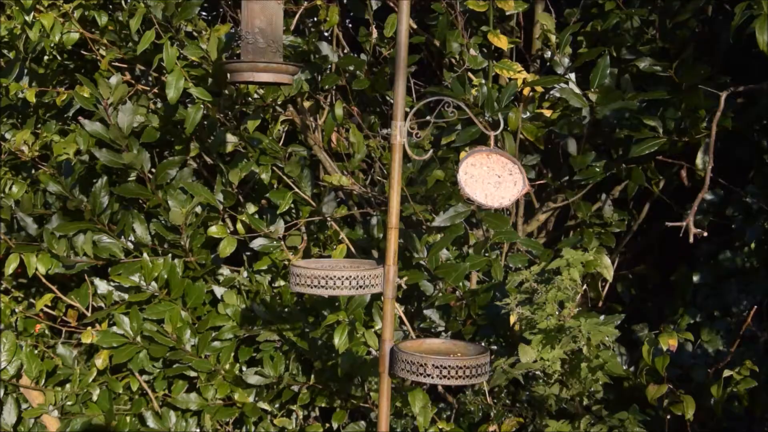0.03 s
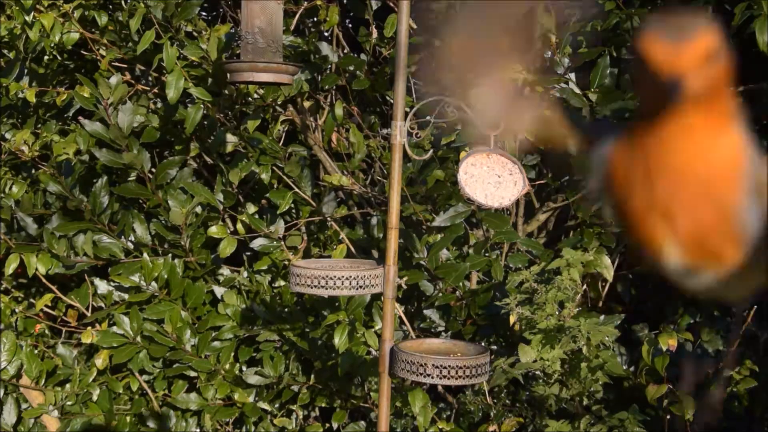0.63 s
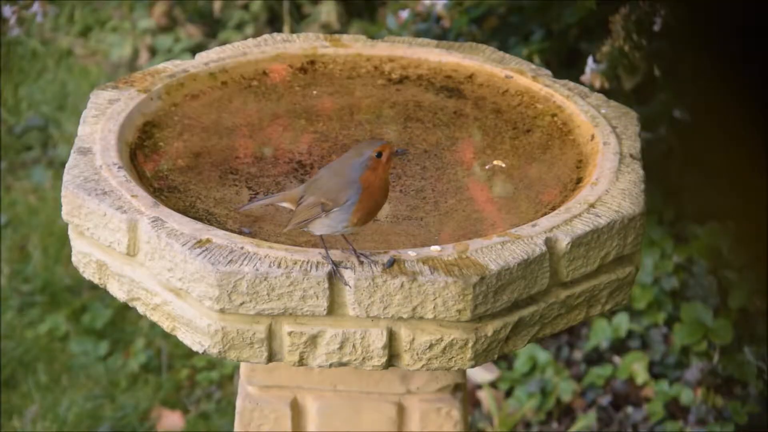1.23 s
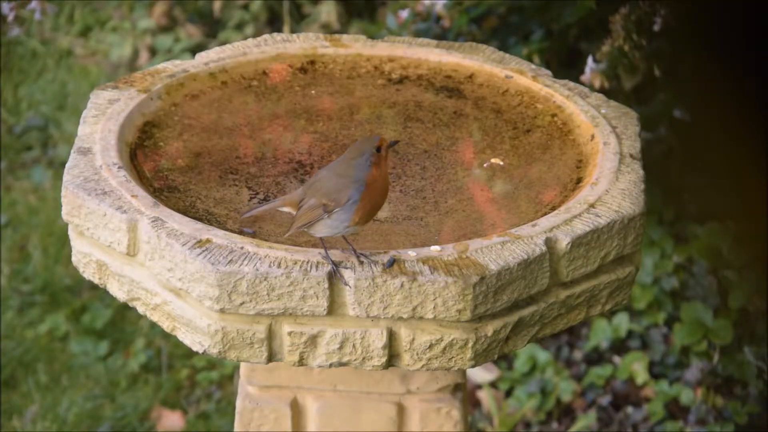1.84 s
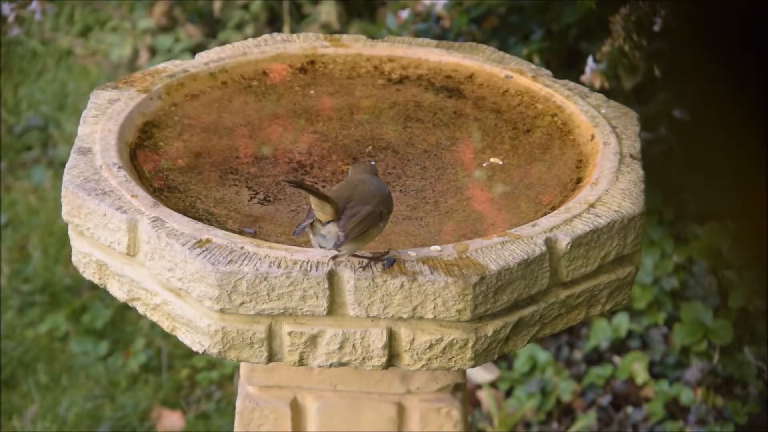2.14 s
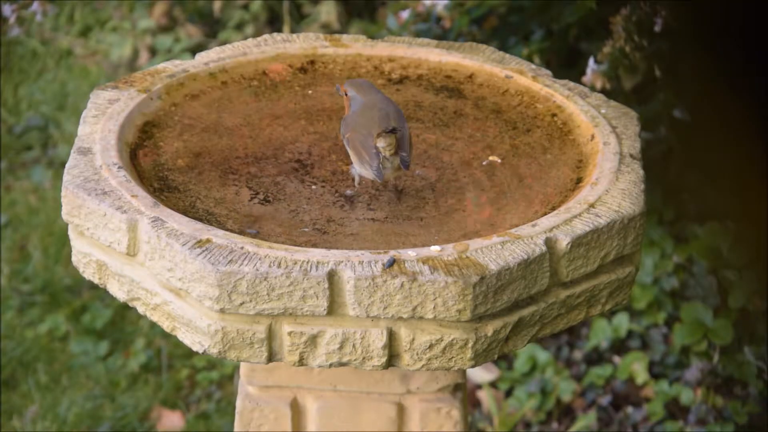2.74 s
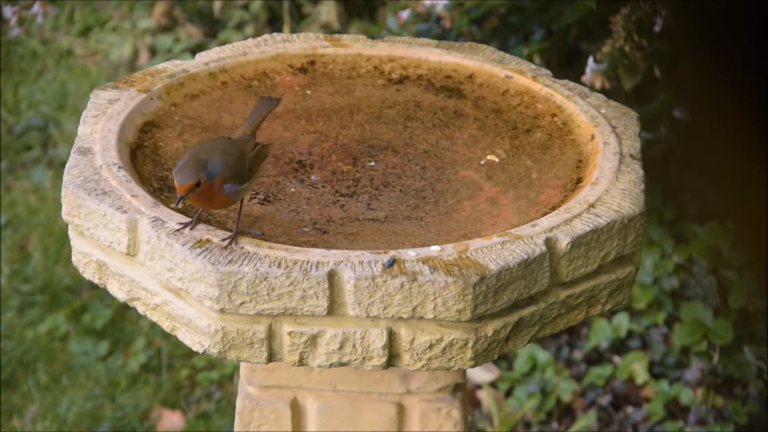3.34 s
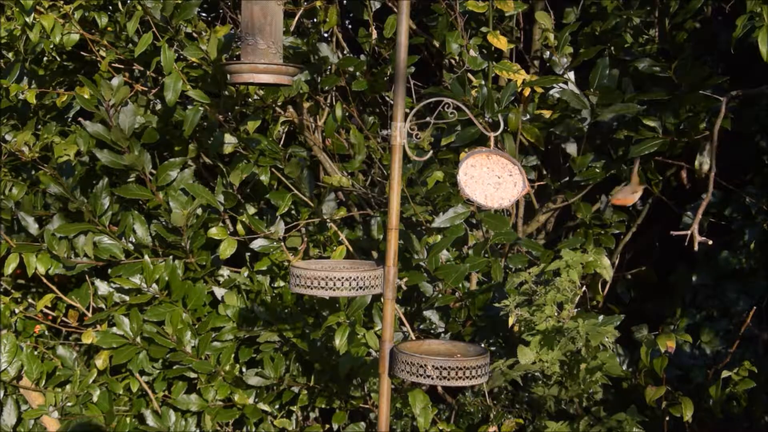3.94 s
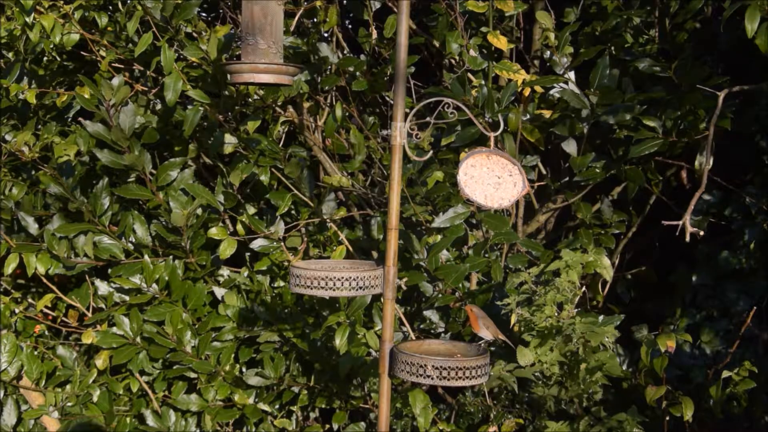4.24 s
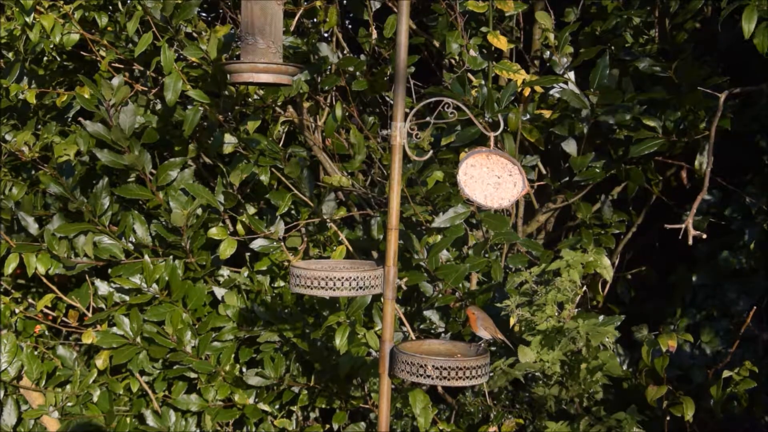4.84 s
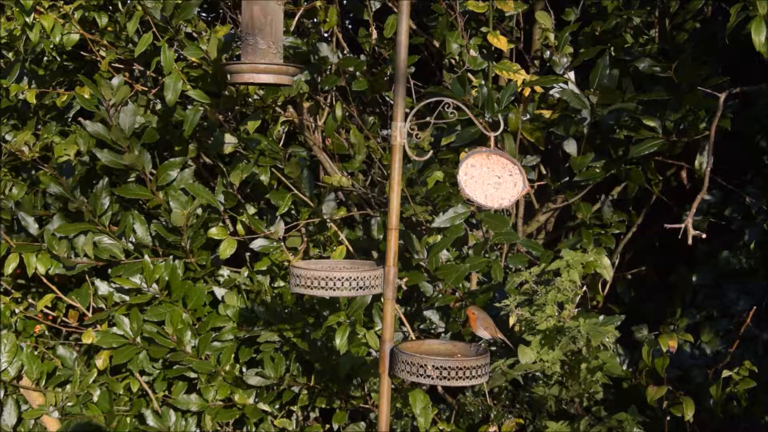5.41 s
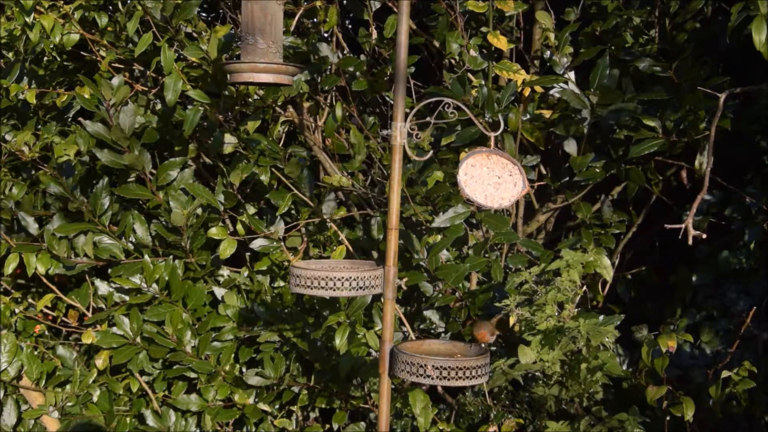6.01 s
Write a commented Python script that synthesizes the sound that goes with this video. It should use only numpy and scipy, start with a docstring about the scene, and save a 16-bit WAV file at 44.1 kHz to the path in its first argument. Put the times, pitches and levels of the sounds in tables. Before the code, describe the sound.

Outdoors in a garden, a nearby songbird delivers thin, raspy high notes that drop into clear whistles and rapid chips. A second phrase of short downward slides follows, with barely audible ticks of bath water around it. The bird pauses, then ends with a bright warbling burst and a soft trailing note. A quiet, uneven background rush runs underneath, and hedges add a brief echo to the close song.

```python
"""Robin in a garden

A robin sings three quick phrases close to a small stereo microphone. The two sides of its syrinx
give pure whistles, hoarse two-voiced notes and short chips, which echo briefly off nearby surfaces
and hedges. Soft outdoor background noise fades up and down behind it, with faint ticks of bath water."""
import sys
import numpy as np
from scipy import signal
from scipy.fft import rfft, irfft
from scipy.io import wavfile
from scipy.ndimage import uniform_filter1d, minimum_filter1d

SR = 44100
rng = np.random.default_rng(int(sys.argv[2]) if len(sys.argv) > 2 else 0)


def master_out(mix):
    """Clip the mix to full scale and print it as 16-bit PCM to the path in sys.argv[1]."""
    frames = np.transpose(np.atleast_2d(mix))
    ceiling = np.clip(frames, -1, 1)
    pcm = np.round(ceiling * 32767).astype(np.int16)
    wavfile.write(sys.argv[1], SR, pcm)


N = 267510
TIME = np.arange(N) / SR
WHISTLE_EDGE_S = .005

# fades of the background noise: t/s, level/dB, relative upper band/dB
BACKGROUND_LEVEL = [(0.1, -61, -11), (0.28, -48, -6), (0.74, -51, -6), (1.06, -44.5, -9.5),
                    (1.94, -40.5, -6.5), (2.53, -49.5, -1), (3.65, -41.5, -3.5), (3.79, -40, -6),
                    (3.81, -45.5, -4.5), (4.29, -58, -11.5), (4.66, -47, -6), (5.01, -46.5, -6),
                    (5.27, -54.5, -10.5), (6.05, -61, -17)]


def undb(db):
    """Decibels to gain."""
    return 10 ** (np.asarray(db) / 20)


def add(out, start_s, sound):
    """Mix a sound in at its time."""
    i = int(start_s * SR)
    out[i:i + len(sound)] += sound[:N - i]


def walk(size, rate_hz):
    """Smooth random wander, spread near 1."""
    hold = max(int(SR / rate_hz), 1)
    steps = np.repeat(rng.standard_normal(size // hold + 1), hold)
    return 1.35 * uniform_filter1d(uniform_filter1d(steps, hold), hold)[:size]


def delay(x, lag_s):
    """Fractional-sample delay."""
    return irfft(rfft(x) * np.exp(-2j * np.pi * np.fft.rfftfreq(N, 1 / SR) * lag_s), N)


def coloured(spectrum):
    """Noise of the given spectrum, rms 1."""
    hz, db = np.transpose(spectrum)
    gain = undb(np.interp(np.log(np.fft.rfftfreq(N, 1 / SR) + 1), np.log(hz), db))
    noise = irfft(rfft(rng.standard_normal(N)) * gain, N)
    return noise / noise.std()


def edges(size, edge_s):
    """Rounded attack and release."""
    from_edge_s = np.minimum(np.arange(size), np.arange(size)[::-1]) / SR
    return np.sin(np.pi / 2 * np.minimum(from_edge_s / edge_s, 1)) ** 2


def contour(shape, length_s, top_hz, end_hz):
    """Stretch a note shape to a length and pitch range; returns f/Hz, level/dB."""
    share, height, db = np.transpose(shape)
    u = np.linspace(0, 1, int(length_s * SR))
    return end_hz + (top_hz - end_hz) * np.interp(u, share, height), np.interp(u, share, db)


def note_clock(length_s):
    """Seconds into a note, and the share of it gone by."""
    t = TIME[:int((length_s + WHISTLE_EDGE_S) * SR)]
    return t, t / t[-1]


def outdoor_noise(gain_db=1.5, upper_lift_db=6, side_db=-27, split_hz=1400):
    """Soft, nearly mono background noise; its level and its upper band fade up and down."""
    # noise spectrum: f/Hz, relative density/dB
    spectrum = [(25, -36.5), (200, -17.5), (500, -10), (900, 0), (1350, -1), (2000, -8.5), (3000, -18),
                (7000, -38.5), (15000, -45)]
    at_s, db, upper_db = np.transpose(BACKGROUND_LEVEL)
    body_gain = undb(np.interp(TIME, at_s, db, left=-np.inf) + gain_db)
    upper_gain = undb(np.interp(TIME, at_s, upper_db) + upper_lift_db)
    noise = coloured(spectrum) + undb(side_db) * coloured(spectrum) * np.array([[1], [-1]])
    low = signal.sosfiltfilt(signal.butter(2, split_hz, fs=SR, output="sos"), noise)
    return body_gain * undb(.5 * walk(N, 17)) * (low + (noise - low) * upper_gain)


def rumble(db=-76, peak_s=4.82, half_width_s=.22, lift_db=7):
    """Faint wavering rumble that swells under the last phrase."""
    swell_db = 2.8 * walk(N, 11) + lift_db * np.exp(-((TIME - peak_s) / half_width_s) ** 2)
    return coloured([(30, -14.5), (120, -7.0), (1000, -56.5)]) * undb(db + swell_db)


def hiss(db=-70):
    """Thin steady hiss, heard when the outdoor noise fades down."""
    # hiss spectrum: f/Hz, relative density/dB
    spectrum = [(6000, -5), (7200, -11.5), (15000, -19.5)]
    return undb(db) * coloured(spectrum)


def hoarse_notes(sum_db=-28, sideband_db=-9.5, burst_db=14, burst_s=.007):
    """Both sides of the syrinx sound at once and mix into sum tones and sidebands."""
    # high notes: t/s, length/s, top f/Hz, level/dB, relative lower voice/dB
    notes = [(.637, .068, 7350, -37, -22), (.758, .071, 7400, -26.5, -20), (.901, .077, 7150, -21, -10),
             (1.076, .04, 6800, -18.5, -15), (1.137, .016, 7050, -24, -9), (1.155, .017, 6850, -23, -15),
             (1.190, .011, 6600, -23.5, -4), (1.203, .026, 6950, -20.5, -17), (1.250, .013, 6900, -22, -5),
             (1.265, .028, 7050, -20, -19), (1.314, .012, 7050, -21.5, -7), (1.329, .02, 7000, -21, -18),
             (1.377, .011, 6650, -23.5, -5), (1.393, .027, 7000, -22, -19)]
    # flick and sag: share of length, height from end to top pitch, level/dB
    shape = [(0, -1.4, -8), (.08, .7, -1), (.17, 1, 1), (.36, .56, 0), (.7, .4, 0), (1, 0, -8)]
    out = np.zeros(N)
    for at_s, length_s, top_hz, db, lower_db in notes:
        hz, swell_db = contour(shape, length_s, top_hz, end_hz=top_hz * (.95 - 1.9 * length_s))
        size = len(hz)
        upper = rough_voice(hz)
        lower = rough_voice(2800 + .4 * hz)
        onset_db = burst_db * np.exp(-TIME[:size] / burst_s)
        lower *= undb(np.minimum(lower_db + onset_db, 0))
        beat = undb(sideband_db) * upper * lower.conj()
        sum_tones = undb(sum_db) * (upper + 2.2 * lower) ** 2
        voice = upper * (1 - beat + beat ** 2) + lower + sum_tones
        envelope = undb(db + swell_db + walk(size, 400)) * edges(size, .002)
        add(out, at_s, voice.imag * envelope)
    return with_breath(out, db=-9)


def rough_voice(hz):
    """One side of the syrinx: a phasor with slow and fast pitch jitter."""
    jitter = 1 + .011 * walk(len(hz), 250) + .011 * walk(len(hz), 2000)
    return np.exp(2j * np.pi * np.cumsum(hz * jitter) / SR)


def with_breath(note, db):
    """Air forced through the syrinx adds hiss that grows as the note's amplitude squared."""
    highpass = signal.butter(2, 5000, "highpass", fs=SR, output="sos")
    turbulence = rng.standard_normal(len(note)) * note * np.abs(note)
    return note + undb(db) * signal.sosfilt(highpass, turbulence)


def near_echoes(notes, chip_run):
    """Nearby surfaces each reflect the song once."""
    # reflections: delay/s, note level/dB, chip level/dB
    surfaces = [(.0062, -29.5, -12), (0.0137, -13.5, -18.5)]
    return sum(delay(undb(note_db) * notes + undb(chip_db) * chip_run, lag_s)
               for lag_s, note_db, chip_db in surfaces)


def hedges(song, t60_s=.38, build_s=.033):
    """Leaves scatter the song into a short tail."""
    t = TIME[:int(.7 * SR)]
    tail = rng.standard_normal(len(t)) * undb(-60 * t / t60_s) * np.minimum(t / build_s, 1)
    return signal.fftconvolve(song, tail / np.linalg.norm(tail))[:N]


def syrinx(hz, db, lower_db, jitter, flutter_db, overtone_lift_db, edge_s=WHISTLE_EDGE_S, gap_hz=968):
    """A near-sine membrane, and a second a little lower that beats against it."""
    # harmonics 2 to 4: base level/dB
    harmonics_db = (-43, -43, -55)
    size = len(hz)
    hz = uniform_filter1d(hz, size=90, mode="nearest") * (1 + jitter * walk(size, 600))
    upper = np.exp(2j * np.pi * np.cumsum(hz) / SR)
    beat = np.exp(2j * np.pi * np.cumsum(gap_hz * (1 + .1 * walk(size, 130))) / SR)
    lower_gain = undb(lower_db)
    effort = undb(db + flutter_db * walk(size, 400))
    # coupling adds a weaker sideband above the pair
    pair = upper * (1 + lower_gain / beat - lower_gain * beat / 6)
    overtones = sum(undb(level_db) * pair ** k * (k * hz < SR / 2)
                    for k, level_db in enumerate(harmonics_db, 2))
    # hard blowing, or both sides sounding, frays the overtones
    rasp = undb(7) * effort ** 2 + lower_gain / 2
    fray = 1 + rasp * (walk(size, 3000) + 1j * walk(size, 3000))
    voice = pair + undb(overtone_lift_db) * (.5 + 2 * effort) * overtones * fray
    return voice.imag * effort * edges(size, edge_s)


def whistle(hz, db, overtone_lift_db):
    """Clean glide; the lower voice creeps in only near 6200 Hz."""
    lower_db = -22 - np.abs(hz - 6200) / 90
    return syrinx(hz, db, lower_db, jitter=.004, flutter_db=.6, overtone_lift_db=overtone_lift_db)


def arches(rise_s=.016, hold_s=.028, fade_s=.078, dip_db=-9.5, dip_s=.0041):
    """Whistles that shoot up, thin at the turn and sink to a resting pitch as they fade."""
    # arched whistles: t/s, length/s, start f/Hz, peak f/Hz, end f/Hz, relax/s,
    # level/dB, fade/dB, breath/dB
    notes = [(1.453, 0.05, 3980, 6680, 6170, 0.017, -16.5, -14.5, -20.5),
             (1.572, 0.097, 3550, 6760, 5750, 0.024, -10, -21, -15.5),
             (1.712, 0.049, 3800, 5280, 4237, 0.0079, -7.5, -24, -32)]
    out = np.zeros(N)
    for at_s, length_s, start_hz, peak_hz, end_hz, relax_s, db, fade_db, breath_db in notes:
        t, _ = note_clock(length_s)
        past_peak_s = t - rise_s
        rising_hz = peak_hz + (start_hz - peak_hz) * (past_peak_s / rise_s) ** 2
        sinking_hz = end_hz + (peak_hz - end_hz) * np.exp(-past_peak_s / relax_s)
        hz = np.where(past_peak_s < 0, rising_hz, sinking_hz)
        faded = 1 - np.exp(-np.maximum(t - hold_s, 0) / fade_s)
        level_db = db + fade_db * faded + dip_db * np.exp(-(past_peak_s / dip_s) ** 2)
        note = whistle(hz, level_db, overtone_lift_db=3)
        add(out, at_s - WHISTLE_EDGE_S / 2, with_breath(note, breath_db))
    return out


def chips():
    """A run of tiny pitch arches with hard attacks."""
    # chips: t/s, length/s, top f/Hz, end f/Hz, level/dB
    notes = [(1.776, 0.013, 4540, 2900, -12.5), (1.839, 0.014, 4910, 3200, -12),
             (1.9008, 0.011, 5010, 3000, -14), (1.9663, 0.013, 4675, 3430, -14.5),
             (2.016, 0.0123, 4986, 3910, -20), (2.025, 0.0144, 4770, 3510, -20.5),
             (2.089, 0.013, 4760, 3510, -17.5), (2.096, 0.017, 4030, 3070, -21),
             (2.145, 0.0087, 5000, 4080, -21.5), (2.16, 0.017, 4760, 3360, -20),
             (2.237, 0.019, 4670, 3390, -23), (2.287, 0.0087, 4060, 3930, -26),
             (2.311, 0.014, 4150, 3340, -26)]
    # arch of a chip: share of length, height from end to top pitch, level/dB
    shape = [(0, .45, 0), (.22, .72, 2.5), (.45, 1, -4), (.72, .6, -4), (1, .14, -7)]
    out = np.zeros(N)
    for at_s, length_s, top_hz, end_hz, db in notes:
        hz, swell_db = contour(shape, length_s, top_hz, end_hz)
        add(out, at_s, syrinx(hz, db + swell_db, lower_db=-28, jitter=.018, flutter_db=1,
                              overtone_lift_db=6, edge_s=.0013))
    return with_breath(out, db=-25)


def droplets(start_s=2.15, end_s=3.7, count=14, decay_s=.0015):
    """Faint ticks of bath water flicked up by the bird's feet."""
    out = np.zeros(N)
    t = TIME[:500]
    for when, size in rng.random((count, 2)):
        tick = rng.standard_normal(len(t)) * np.exp(-t / decay_s)
        add(out, start_s + when * (end_s - start_s), undb(-55) * 2 * size ** 2 * tick)
    return signal.sosfilt(signal.butter(2, 3000, "highpass", fs=SR, output="sos"), out)


def slurs(scoop_s=.0052, bend_power=2.1, ends_db=-2):
    """Whistles that scoop quickly onto a pitch and bend away late."""
    # slurred whistles: t/s, length/s, start f/Hz, held f/Hz, end f/Hz, level/dB, level change/dB
    notes = [(2.843, 0.028, 8040, 7130, 6560, -40, 12), (2.867, 0.021, 6750, 5130, 5400, -38.5, -4.5),
             (2.936, 0.011, 5130, 4560, 4720, -26, -4.5), (2.95, 0.037, 4490, 3492, 3440, -24, 7.5),
             (2.986, 0.014, 3420, 3250, 2860, -28.5, -2), (3.009, 0.014, 4210, 3466, 3840, -16, -11.5),
             (3.042, 0.0044, 5120, 5200, 4400, -32, 11), (3.046, 0.052, 4560, 4015, 3904, -13.5, 2),
             (3.101, 0.028, 5150, 4740, 4500, -21, -11), (3.185, 0.016, 5450, 4380, 4570, -16, -3),
             (3.205, 0.039, 4740, 3690, 3150, -10, -14), (3.316, 0.02, 4180, 3700, 3100, -16, -8),
             (3.426, 0.021, 3990, 3590, 2780, -23.5, -6), (4.362, 0.066, 7950, 7880, 8200, -56.5, 9),
             (4.455, 0.065, 8740, 8040, 8730, -55.5, 24.5), (4.67, 0.039, 4780, 5050, 4320, -24, -3.5),
             (4.695, 0.023, 3500, 4070, 3980, -5, -5.5), (4.855, 0.033, 5180, 5480, 4870, -22, -2),
             (4.897, 0.026, 4410, 4275, 4280, -18.5, 5.5)]
    out = np.zeros(N)
    for at_s, length_s, start_hz, held_hz, end_hz, db, change_db in notes:
        t, u = note_clock(length_s)
        scoop_hz = (start_hz - held_hz) * np.exp(-t / scoop_s)
        bend_hz = (end_hz - held_hz) * u ** bend_power
        level_db = db + change_db * u + ends_db * (2 * u - 1) ** 2
        note = whistle(held_hz + scoop_hz + bend_hz, level_db, overtone_lift_db=2)
        add(out, at_s - WHISTLE_EDGE_S / 2, note)
    return out


def duets():
    """Each side of the syrinx glides on its own unsteady pitch."""
    # two-voiced notes: t/s, length/s, start f/Hz, end f/Hz, start gap/Hz, end gap/Hz,
    # level/dB, relative lower voice/dB
    notes = [(3.259, 0.04, 3750, 3960, 500, 654, -32, -2.5),
             (3.362, 0.052, 3780, 3655, 623, 475, -35.5, -3.5),
             (3.473, 0.053, 4100, 3990, 653, 827, -44, 4), (4.595, 0.012, 3565, 3943, 751, 1150, -22, -5.5),
             (4.79, 0.01404, 3660, 4765, 957, 1460, -15, -4.5),
             (4.991, 0.087, 4213, 4250, 407, 384, -34, -5)]
    out = np.zeros(N)
    for at_s, length_s, start_hz, end_hz, start_gap_hz, end_gap_hz, db, lower_db in notes:
        _, u = note_clock(length_s)
        hz = start_hz + (end_hz - start_hz) * u
        gap_hz = start_gap_hz + (end_gap_hz - start_gap_hz) * u
        note = syrinx(hz, db, lower_db, jitter=.012, flutter_db=1.8, overtone_lift_db=-6, gap_hz=gap_hz)
        add(out, at_s - WHISTLE_EDGE_S / 2, note)
    return out


def warbles(gain_db=2):
    """Whistles whose pitch swings up and down: two loud, one dying away."""
    # one list of points per warble: t/s, f/Hz, level/dB
    notes = [
        [(4.62, 3130, -27.5), (4.631, 4000, -12), (4.641, 3215, -15.5), (4.651, 3980, -10.5),
         (4.657, 3789, -10), (4.672, 3847, -9.5)],
        [(4.807, 3156, -17), (4.814, 4300, -9.5), (4.821, 3848, -9), (4.837, 3633, -11), (4.848, 4340, -7.5),
         (4.856, 4397, -8), (4.865, 4400, -13)],
        [(4.93, 4234, -36), (4.963, 4250, -35.5), (4.99, 3765, -37), (5.035, 3840, -46.5)],
    ]
    out = np.zeros(N)
    for points in notes:
        at_s, hz, db = np.transpose(points)
        elapsed_s, _ = note_clock(at_s[-1] - at_s[0])
        t = at_s[0] - WHISTLE_EDGE_S / 2 + elapsed_s
        note = whistle(np.interp(t, at_s, hz), np.interp(t, at_s, db) + gain_db, overtone_lift_db=3)
        add(out, t[0], note)
    return with_breath(out, db=-29)


def scene(song_top_hz=13000, notch_hz=9300, tail_db=-21, tail_side_db=-12, lean_db=-22, left_lag_s=13e-6):
    """Song and echoes over the background; hoarse notes lean left, sound reaches the right port first."""
    lowpass = signal.butter(6, song_top_hz, fs=SR, output="sos")
    hoarse, arched = signal.sosfilt(lowpass, [hoarse_notes(), arches()])
    notch = signal.iirnotch(notch_hz, 6, fs=SR)
    notes = signal.lfilter(*notch, hoarse + arched + slurs() + warbles() + duets())
    chip_run = signal.lfilter(*notch, chips())
    song = notes + chip_run
    mid = song + near_echoes(notes, chip_run) + droplets() + undb(tail_db) * hedges(song)
    side = undb(tail_db + tail_side_db) * hedges(song) + undb(lean_db) * hoarse
    background_start_s = BACKGROUND_LEVEL[0][0]
    background = outdoor_noise() + (rumble() + hiss()) * (TIME > background_start_s)
    left, right = np.array([mid + side, mid - side]) + background
    return np.array([delay(left, left_lag_s), right])


def record(dry, ceiling=.5, cutoff_hz=15850):
    """A fast limiter flattens the loudest notes; a steep low-pass cuts the top."""
    needed_gain = ceiling / np.maximum(np.abs(dry).max(axis=0), ceiling)
    gain = uniform_filter1d(minimum_filter1d(needed_gain, size=40), size=40)
    return signal.sosfilt(signal.ellip(8, .2, 70, cutoff_hz, fs=SR, output="sos"), dry * gain)


dry = scene()
out = record(dry)
master_out(out)
```